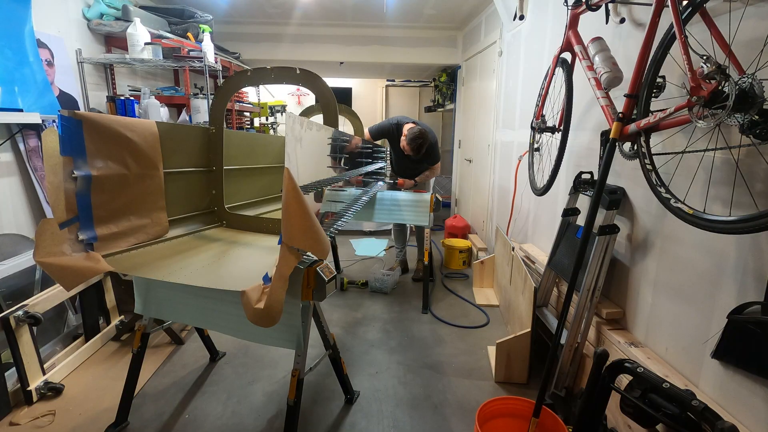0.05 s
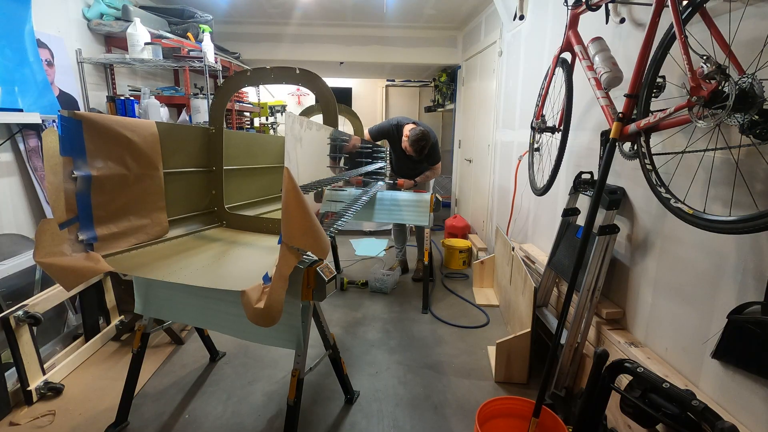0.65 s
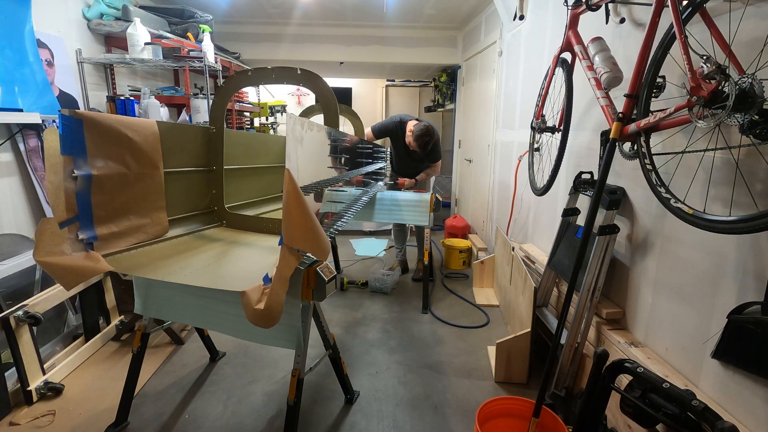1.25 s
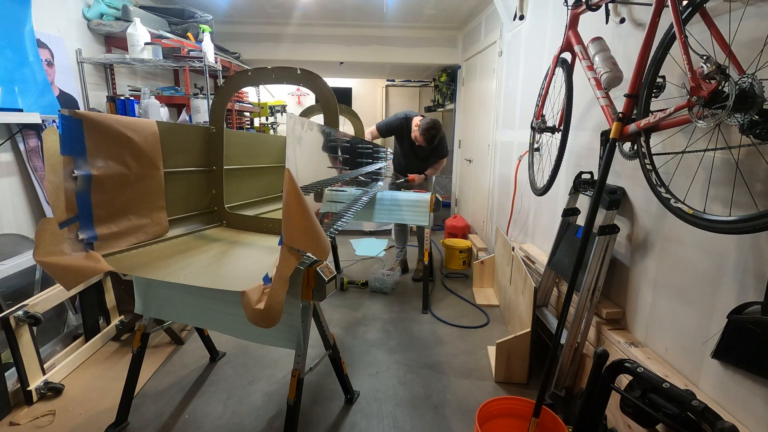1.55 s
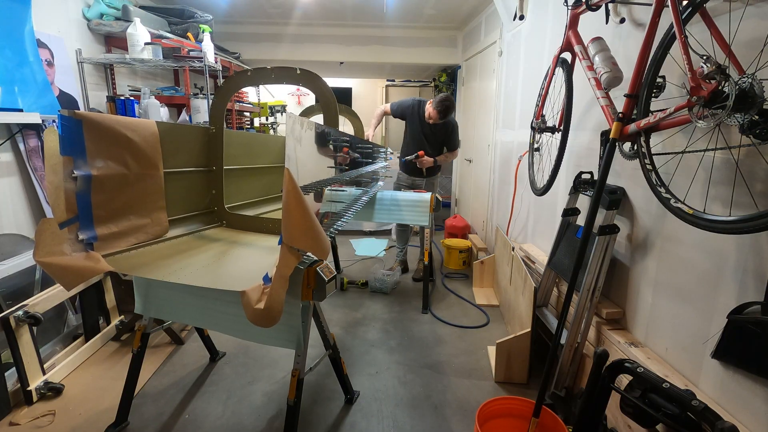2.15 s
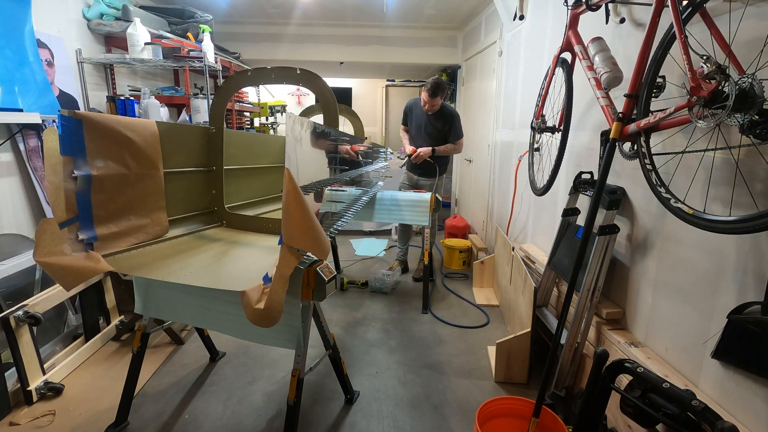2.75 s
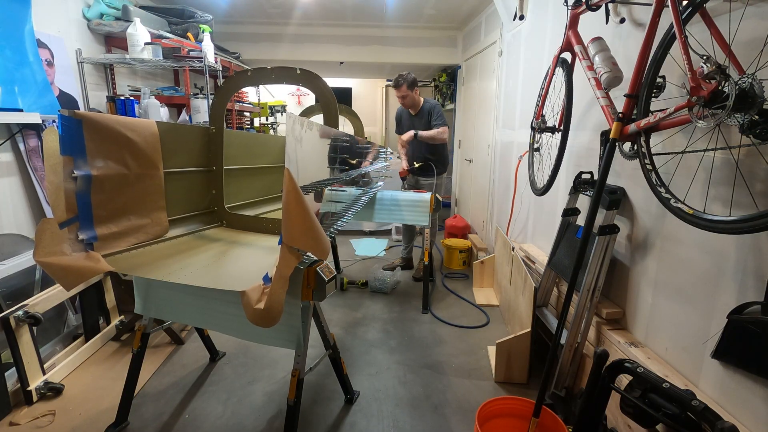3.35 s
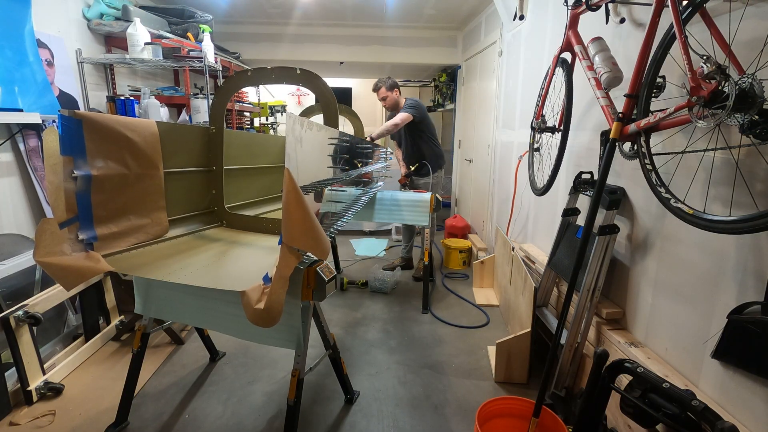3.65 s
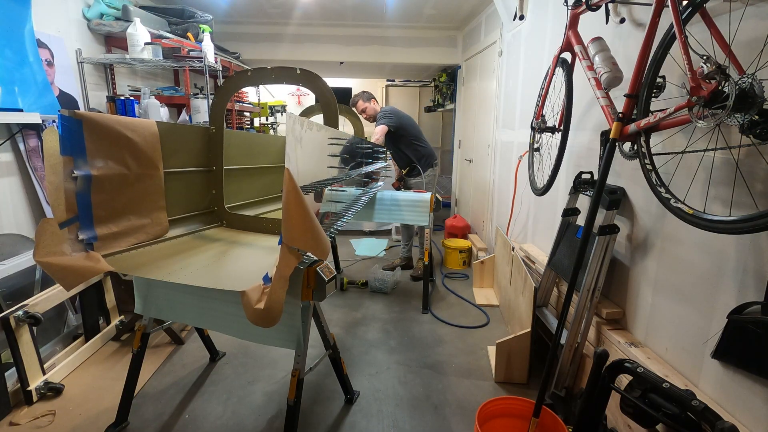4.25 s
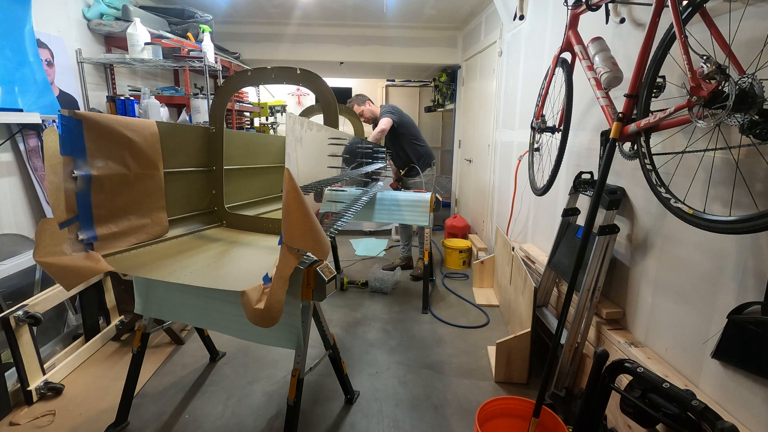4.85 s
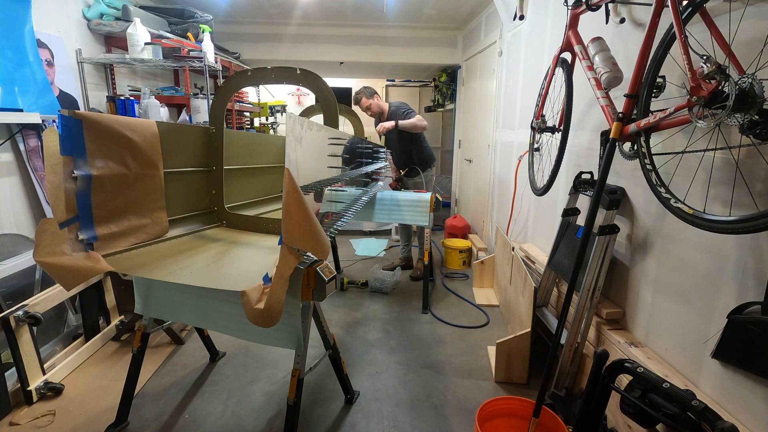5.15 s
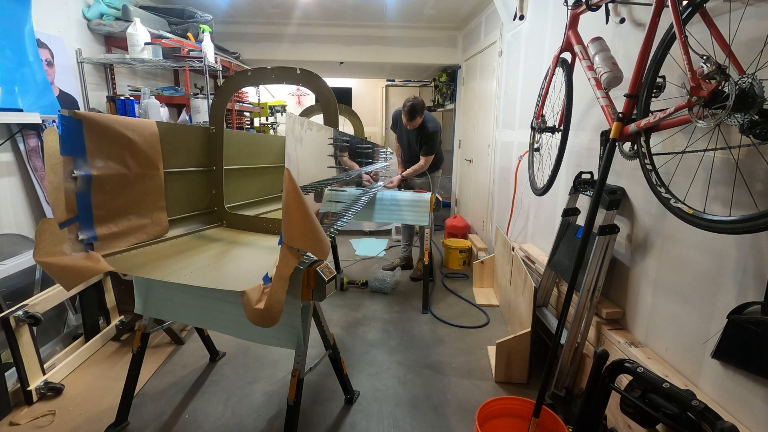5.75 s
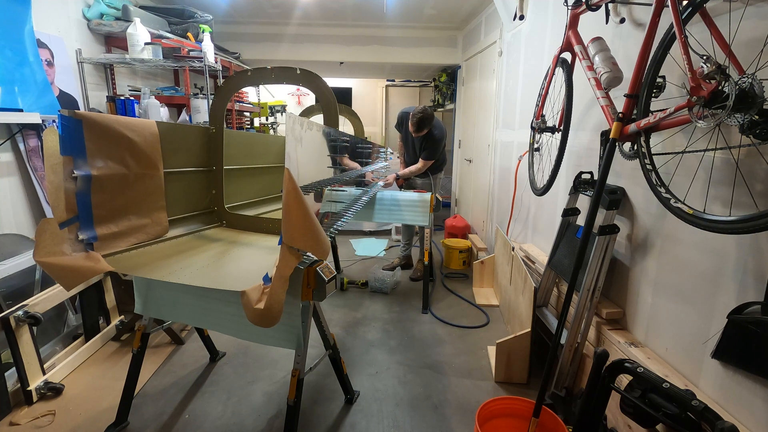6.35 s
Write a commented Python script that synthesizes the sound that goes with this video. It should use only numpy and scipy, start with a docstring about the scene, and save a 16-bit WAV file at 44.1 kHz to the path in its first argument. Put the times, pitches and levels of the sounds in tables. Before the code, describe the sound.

A soft trigger knock and a light metal tap lead straight into a loud burst from an air rivet gun at 0.4 seconds. It hammers an aluminium airframe about 25 times a second with a hiss of air, booming at first and then ringing brighter, until a few slack blows end it around 1.3 seconds. Everything afterwards is much quieter. Faint steel scrapes and taps follow until 2 seconds while the frame's low ring fades. Small tools click near 2.7 seconds, and at 3.1 one knocks on a bench and slides with a brief swish. From 4.1 to 4.8 a tool bumps and drags along the sheet. A heavy tool thuds down at 5 seconds, followed by a few tiny clicks. The work is heard from across a garage with a short echo, over a faint ventilation hum, low rumble and barely audible air leak.

```python
"""A loud, rattling burst of metal blows rings out from the far end of a garage, just after a light tap.
It is an air-driven rivet gun setting one rivet in an aluminium airframe, at about 25 blows a second.
The metal skin booms at first, rings brighter as the rivet hardens, and the last blows fall slack.
Then tools tap, slide over the sheet and are put down, over a ventilation hum and a faint air leak."""
import sys
import numpy as np
from scipy import signal
from scipy.fft import rfft, irfft, next_fast_len
from scipy.io import wavfile
from scipy.ndimage import map_coordinates

SR = 44100
rng = np.random.default_rng(int(sys.argv[2]) if len(sys.argv) > 2 else 0)


def waveform_to_disk(signal):
    """Save audio, clipped to [-1, 1], as 16-bit WAV at the path in sys.argv[1]."""
    frames = np.transpose(np.atleast_2d(signal))
    scaled = np.clip(frames, -1, 1) * 32767
    samples = np.round(scaled).astype(np.int16)
    wavfile.write(sys.argv[1], SR, samples)


N = 291060
FIRST_BLOW_S = 0.4108

# Tone colours (how strong each pitch is) of steel crack, skin clang and frame boom: f/Hz, level/dB
CRACK = [(820, -33.5), (1400, -10), (1640, -7), (1880, -2.5), (2070, -4), (2270, -3), (3040, -2),
         (4510, -3.5), (4880, -10), (6030, -11.5), (10300, -28.5), (13800, -38), (15600, -46.5)]
CLANG = [(260, -43), (450, -10.5), (540, -9), (630, -4), (780, -5.5), (1000, -2), (1160, -6.5), (1610, -8),
         (1750, -6), (2210, -35.5), (3740, -120)]
BOOM = [(15, -70), (40, -36), (110, -12.5), (170, -7), (260, 0.5), (345, 0), (420, -4), (475, -23),
        (545, -15), (660, -16.5), (900, -40), (1600, -120)]
# Clear notes of the rivet set, the gun's steel tip: f/Hz, level/dB
TIP_NOTES = [(543.7, -51.5), (1028, -43), (1863, -40.5), (2191, -37.5), (2315, -41), (3381, -40),
             (3510, -41), (3580, -38), (3709, -39.5), (4059, -39.5), (4587, -41.5), (4683, -47),
             (5830, -43.5), (6250, -49.5), (6848, -50.5), (6993, -49.5), (7095, -46), (7892, -49.5)]
def rivet_gun(count=19, first_gap_s=0.0378, slowing_s=0.00017):
    """A piston hammers, slowing a little; each blow cracks on steel, clangs the skin, shoves the frame."""
    k = np.arange(count)
    age = first_gap_s * k + slowing_s * k * (k - 1) / 2
    times, first = FIRST_BLOW_S + age, k == 0
    soft = np.exp(-age / 0.16)  # the rivet hardens under the blows
    eased = np.exp((age - age[-1]) / 0.04)  # the push on the gun eases at the end
    extra_db = 2.5 * first  # the first blow has full air pressure behind it
    boom_db = -36 + 14.5 * soft + extra_db
    clang_db = -23 - 25 * age + 10 * eased + extra_db  # dies as the rivet clamps the sheets, then returns
    crack_db = -21.5 + extra_db
    tilt, no_tilt = 2.2 * (1 - soft) + 3.2 * first, np.zeros(count)  # added brightness, dB per octave
    out = hammering(metal(CRACK, ring_db=0), times, crack_db, tilt,
                    alike=0.88, direct_db=-2.5, direct_s=0.016)
    out += hammering(metal(CLANG, ring_db=-0.5), times + 0.003, clang_db, no_tilt,
                     alike=0.88, direct_db=-2.5, direct_s=0.02)
    out += hammering(colour(BOOM), times + 0.004, boom_db, no_tilt, alike=0.7, direct_db=2, direct_s=0.02)
    shove = frame_ring(rise_s=0.0045)
    tip = [(hz, db, 0.4) for hz, db in TIP_NOTES]  # each note rings for 0.4 s
    for s, frame_db, steel_db in zip(times, boom_db, crack_db):
        add(out, s + 0.003, amp(frame_db - 0.5) * shove)
        add(out, s, amp(steel_db - 10.5) * tones(tip, scatter_db=2))
    return out


def hammering(gain, times, levels_db, tilts, alike, direct_db, direct_s):
    """Blows on one spot: each repeats much of the same ring, and the rest changes as the tool shifts."""
    out = np.zeros((2, N))
    same = strike(gain, direct_db, direct_s, rise_s=0.00061)
    for s, db, tilt in zip(times, levels_db, tilts):
        fresh = strike(gain, direct_db, direct_s, rise_s=0.0018)
        blow = np.sqrt(alike) * same + np.sqrt(1 - alike) * fresh
        add(out, s, amp(db) * filtered(blow, lambda hz: amp(tilt * np.log2(np.maximum(hz, 1000) / 3500))))
    return out


# Low notes of the airframe: f/Hz, level/dB, ring time/s (the time to fade by 60 dB)
FRAME_NOTES = [(52, -16.5, 0.18), (73.7, -27, 3.9), (78.0, -32.5, 4.3), (100, -11.5, 0.51),
               (159, -7.5, 0.19), (178.7, -20, 0.95), (215.3, -6.5, 0.2), (258.3, -20, 2.1),
               (287, -4, 0.099), (349.4, 1, 0.22), (390, -11.5, .07), (543, -7.5, 0.22)]
def frame_ring(rise_s):
    """The airframe hums its low notes after one push."""
    t = np.arange(2 * SR) / SR
    ring = sum((-1) ** k * amp(db - 60 * t / ring_s) * np.sin(2 * np.pi * hz * t)
               for k, (hz, db, ring_s) in enumerate(FRAME_NOTES))
    return unit_start(ring * (1 - np.exp(-t / rise_s)))


# Pitches at which the sheet and the gun's tip ring: f/Hz, width/Hz, level/dB (halved when used)
METAL_PEAKS = [(516, 20, -15.5), (1030, 170, -2.5), (1291, 150, -9.5), (1480, 180, -5.5), (1873, 98, 4.5),
               (2170, 97, -5.5), (2650, 220, -12.5), (3550, 17, 1), (4000, 42, -4.5), (4600, 46, 4.5),
               (5200, 23, -11), (5102, 60, -16.5), (5900, 54, -9.5), (6200, 25, -12), (6900, 33, -12),
               (7890, 32, -14.5), (9700, 140, -19.5), (10500, 83, -23.5)]
def metal(points, ring_db):
    """A tone colour made stronger wherever the metal likes to ring."""
    peaks = lambda hz: sum(amp(db / 2) * peak(hz, centre, width) for centre, width, db in METAL_PEAKS)
    return lambda hz: amp(along(points, hz)) * (1 + amp(ring_db) * peaks(hz))


# Tone colours of the escaping air and the trigger's knock: f/Hz, level/dB
JET = [(1000, -60.5), (3000, -9.5), (5500, -0.5), (7500, -4), (10000, -11.5), (13000, -22.5),
       (15600, -31.5)]
TRIGGER = [(60, -50.5), (130, -10), (175, -0.5), (230, -10), (400, -34), (900, -120)]
def trigger_and_air():
    """The trigger goes down with a dull knock; spent air hisses ever louder while the gun runs."""
    exhaust = gesture(FIRST_BLOW_S, length_s=0.74, db=-37.5, db_per_s=9, edge_s=0.02)
    out = rub(exhaust, colour(JET), grit_db=0.5)
    add(out, 0.275, amp(-50.5) * strike(colour(TRIGGER), direct_db=10, direct_s=0.015, rise_s=0.005))
    return out


# Last loose blows: t/s, level/dB
SLACK_BLOWS = [(1.164, -21.5), (1.205, -23.5), (1.248, -26), (1.305, -35.5)]
# Tone colour of the rattling sheet: f/Hz, level/dB
RATTLE = [(71, -47), (120, -11), (169, -5), (199, -16), (350, -8.5), (446, -18), (604, -0.5), (905, -7),
          (981, 0), (1330, -11.5), (1470, -9.5), (3230, -11), (4550, -10), (10000, -34), (15000, -58)]
def slack_blows():
    """The trigger is let go and the pressure falls, so the tip bounces loosely and the sheet rattles."""
    out, rattle = np.zeros((2, N)), metal(RATTLE, ring_db=-10)
    for s, db in SLACK_BLOWS:
        add(out, s, amp(db) * strike(rattle, direct_db=-12, direct_s=0.0068, rise_s=0.00067))
    return out


# Light taps on the skin: t/s, clank level/dB, frame boom level/dB
TAPS = [(0.274, -57, -59), (0.389, -29.5, -41), (1.756, -50.5, -56.5), (1.894, -56.5, -58)]
# Tone colour of a clank: f/Hz, level/dB
CLANK = [(290, -39), (500, -6), (665, -1), (883, -14.5), (1350, -9.5), (2390, -15), (4800, -14.5),
         (12300, -39.5), (15000, -71.5)]
# Notes of the bucking bar, the steel block held behind the rivet: f/Hz, level/dB, ring time/s
BAR_NOTES = [(724, -11, 0.33), (1430, -4.5, .45), (1660, -0.5, 0.37), (2600, -10.5, .45),
             (3070, -6.5, 0.33), (4060, -5, .5), (4910, -7, 0.28), (6250, -12.5, .3), (8184, -20.5, .35)]
def taps():
    """The gun's tip and the bar touch the skin before and after the burst; bar and frame ring."""
    out, ring = np.zeros((2, N)), frame_ring(rise_s=0.009)
    for s, db, boom_db in TAPS:
        add(out, s, amp(db) * strike(metal(CLANK, ring_db=0), direct_db=-10, direct_s=0.013, rise_s=0.004))
        add(out, s, amp(db - 9.5) * tones(BAR_NOTES, scatter_db=4.5))
        add(out, s, amp(boom_db) * ring)
    return out


# Tone colour of steel chattering on the rivet: f/Hz, level/dB
CHATTER = [(180, -34.5), (300, -5), (359, 1), (430, -12), (726, -6), (1270, -24.5), (1490, -8), (2040, -6),
           (5180, -23.5), (9490, -25), (15000, -47.5)]
def tip_chatter():
    """The tip chatters ever harder on the rivet head as the trigger is eased in."""
    effort = gesture(0.255, length_s=0.16, db=-63, db_per_s=200, edge_s=0.012)
    return rub(effort, colour(CHATTER), grit_db=3)


# Short scrapes of the bar: t/s, level/dB
BAR_SCRAPES = [(1.49, -55), (1.595, -56.5), (1.756, -53), (1.865, -54)]
# Tone colour of the drumming panel: f/Hz, level/dB
PANEL = [(60, -60), (120, -45), (220, -10), (290, -10.5), (345, 2.5), (400, -8), (600, -48), (1200, -120)]
def bar_scrapes():
    """The bar slides off the rivet, which keeps it singing faintly and drums the panel."""
    moves = [gesture(s, length_s=0.126, db=db, db_per_s=-87, edge_s=0.018) for s, db in BAR_SCRAPES]
    effort = np.linalg.norm(moves, axis=0)
    peaks = lambda hz: sum(peak(hz, centre, width_hz=70) for centre, _, _ in BAR_NOTES)
    singing = lambda hz: amp(along(CHATTER, hz)) * (1 + amp(13) * peaks(hz))
    return rub(effort, singing, grit_db=5.5) + amp(-2) * rub(effort, colour(PANEL), grit_db=4.5)


# Clicks of small tools: t/s, level/dB
CLICKS = [(2.3878, -75), (2.692, -68), (2.7405, -55.5), (3.075, -52), (3.174, -66), (3.5757, -78),
          (3.8207, -67), (5.8787, -76), (5.9354, -74), (6.488, -78), (6.5362, -72.5)]
# Tone colours of a click and of a knock on the bench: f/Hz, level/dB
CLICK = [(590, -50), (1000, 0), (1080, -10.5), (1670, -5), (2530, -3), (5110, -5), (10800, -20),
         (15000, -48.5)]
BENCH = [(240, -37), (400, -8.5), (770, -9), (907, -1), (1350, 1), (2150, -0.5), (3500, -14), (5320, -30),
         (6860, -29), (11000, -46), (15000, -64.5)]
def small_tools():
    """Tools click in the hands, and one knocks hard on the bench."""
    out = np.zeros((2, N))
    for s, db in CLICKS:
        add(out, s, amp(db) * strike(colour(CLICK), direct_db=-13, direct_s=0.0043, rise_s=0.00038))
    add(out, 3.061, amp(-40.5) * strike(colour(BENCH), direct_db=3.5, direct_s=0.0033, rise_s=0.00027))
    return out


# Thuds of a heavy tool: t/s, level/dB
THUDS = [(4.987, -35.5), (5.004, -34), (5.036, -37)]
# Tone colour of a thud: f/Hz, level/dB
HEAVY = [(60, -40), (115, -10), (147, -0.5), (188, -5), (230, -7), (275, 0.5), (340, -8.5), (630, -11.5),
         (780, -15.5), (1040, -13.5), (2900, -19.5), (6000, -26.5), (11000, -40), (15000, -54)]
# Notes of the bench top and the low room note it wakes: f/Hz, level/dB, ring time/s, rise time/s
BENCH_NOTES = [(68.8, -34, 1.02, 0.13), (153.4, -31, 0.68, 0.022), (228, -26, 0.18, 0.0038),
               (266, -28.5, 0.51, 0.0034)]
def heavy_tool():
    """A heavy tool is set down and settles, and the bench top booms."""
    out, t = np.zeros((2, N)), np.arange(SR) / SR
    for s, db in THUDS:
        add(out, s, amp(db) * strike(colour(HEAVY), direct_db=2, direct_s=0.037, rise_s=0.0099))
    for hz, db, ring_s, rise_s in BENCH_NOTES:
        loudness = amp(db - 60 * t / ring_s) * (1 - np.exp(-t / rise_s))
        add(out, THUDS[0][0], loudness * np.sin(2 * np.pi * hz * t))
    return out


# Tone colour of a slide on the bench: f/Hz, level/dB
SWISH = [(470, -49), (800, -27), (1170, -1), (1270, -5.5), (2440, -8), (4970, -2.5), (12200, -30.5),
         (14100, -41.5), (15000, -51.5)]
def bench_slide():
    """A tool slides to rest on the bench with a fading swish."""
    effort = gesture(3.12, length_s=0.34, db=-45, db_per_s=-52, edge_s=0.045)
    return rub(effort, colour(SWISH), grit_db=2)


# Shoves along the sheet: t/s, scuff level/dB, panel boom level/dB, drag level/dB
SHOVES = [(4.152, -41, -42, -41.5), (4.211, -41.5, -38.5, -42.5), (4.279, -47.5, -49.5, -57),
          (4.356, -49, -51, -39.5), (4.45, -44.5, -45, -33), (4.644, -57, -65, -40)]
# Tone colours of the drag and the scuff: f/Hz, level/dB
DRAG = [(260, -37), (450, -23), (530, -16), (691, -11), (814, -32), (986, -11), (1230, -4), (1860, -1.5),
        (2040, -5.5), (3180, 0.5), (3630, -4), (5340, -6), (7960, -14), (15500, -37.5)]
SCUFF = [(350, -30), (420, -11), (575, -7), (787, -6), (1030, -0.5), (1790, -13.5), (3210, -18),
         (6000, -26.5), (8500, -32), (11000, -44), (15000, -65)]
# Lowest notes of the panel: f/Hz, level/dB, ring time/s
PANEL_NOTES = [(349, 3, 0.47), (363, -8, 0.32)]
def sheet_shoves():
    """A tool is shoved along the sheet: each shove is a bump and a fading drag, and the panel drums."""
    moves = [gesture(s, length_s=0.25, db=db, db_per_s=-100, edge_s=0.019) for s, _, _, db in SHOVES]
    effort = np.linalg.norm(moves, axis=0)
    out = rub(effort, colour(DRAG), grit_db=1) + amp(-13) * rub(effort, colour(PANEL), grit_db=5)
    for s, scuff_db, boom_db, _ in SHOVES:
        add(out, s, amp(boom_db - 2) * tones(PANEL_NOTES, scatter_db=0.5))
        add(out, s, amp(scuff_db) * strike(colour(SCUFF), direct_db=-3, direct_s=0.0081, rise_s=0.0043))
        add(out, s, amp(boom_db) * strike(colour(PANEL), direct_db=-3, direct_s=0.016, rise_s=0.003))
    return out


# Tone colours of the low rumble and the ventilation: f/Hz, level/dB
RUMBLE = [(11, -30.5), (18, 4), (49, -2.5), (114, -14), (156, -8), (206, -12.5), (288, -10.5), (381, -21),
          (428, -22.5), (503, -26.5), (600, -26.5), (780, -53.5), (1320, -120)]
VENT = [(240, -27.5), (400, -3), (438, -5), (500, -13.5), (691, -9.5), (846, -14), (1100, -7),
        (1750, -12.5), (4500, -36.5), (5850, -74.5), (9900, -120)]
# How loud each is heard over time: t/s, level/dB
RUMBLE_LEVEL = [(0, -64), (2.6, -65), (4, -60), (5.8, -55.5), (6.6, -59.5)]
HEARD_HUM_LEVEL = [(0, -66), (1.6, -64.5), (2.15, -73), (3, -66.5), (6.3, -65.5), (6.6, -58.5)]
def rumble_and_ventilation():
    """Uneven rumble, and a steady ventilation hum that the recorder briefly turns down after the burst."""
    rumble = amp(over_time(RUMBLE_LEVEL) + 2 * wobble(11)) * room_noise(colour(RUMBLE), N)
    return rumble + amp(over_time(HEARD_HUM_LEVEL) + 0.4 * wobble(4.8)) * room_noise(colour(VENT), N)


# Tone colour of the leak: f/Hz, level/dB
LEAK = [(2000, -18), (3500, -0.5), (5500, 0.5), (8000, -4), (11000, -11), (15000, -24.5)]
def air_leak():
    """Air hisses steadily from the hose coupling; a thin whistle comes and goes after the burst."""
    hiss = amp(-80.5) * room_noise(colour(LEAK), N)
    whistle = gesture(1.6, length_s=3.6, db=-84.5, db_per_s=-0.5, edge_s=0.66)
    return hiss + whistle * room_noise(lambda hz: peak(hz, centre_hz=5400, width_hz=70), N)


# How long the garage echoes: f/Hz, ring time/s
GARAGE_ECHO = [(70, 1), (150, 0.74), (300, .75), (600, 0.59), (2000, 0.56), (6000, 0.5), (12000, .42)]
def strike(gain, direct_db, direct_s, rise_s):
    """One hit heard across the garage: a short direct burst, then echoes whose highs die first."""
    size = 3 * SR // 4
    hz, frame_s, bands = signal.stft(room_noise(gain, size), SR, nperseg=256)
    fade = amp(-60 * frame_s / along(GARAGE_ECHO, hz)[:, None])
    echoes = signal.istft(bands * fade, SR, nperseg=256)[1][:, :size]
    t = np.arange(size) / SR
    burst = 1 + amp(direct_db) * np.exp(-t / direct_s)
    return unit_start(echoes * burst * (1 - np.exp(-t / rise_s)))


def rub(effort, gain, grit_db):
    """Rubbing or hissing: tiny uneven pulses, whose path through the room changes as the tool moves."""
    pulses = unit(rng.standard_normal(N) * amp(grit_db * wobble(250))) * effort
    out, step = np.zeros((2, N)), SR // 20
    for i in np.unique(np.flatnonzero(effort) // step) * step:
        path = strike(gain, direct_db=12, direct_s=0.00587, rise_s=0.00029)
        path /= np.linalg.norm(path[0])
        add(out, i / SR, signal.fftconvolve(pulses[None, i:i + step], path, axes=1))
    return out


def tones(notes, scatter_db):
    """Metal rings at its own notes, with new strengths for every hit."""
    t = np.arange(3 * SR // 4) / SR
    ring = np.zeros((2, len(t)))
    for hz, db, ring_s in notes:
        loudness = amp(db + rng.normal(0, scatter_db) - 60 * t / ring_s)
        ring += loudness * np.sin(2 * np.pi * hz * t + rng.normal(0, 0.71, (2, 1)))
    return unit_start(ring * (1 - np.exp(-t / 0.0015)))


# The part that differs between the ears, against the part they share: f/Hz, level/dB
STEREO_WIDTH = [(30, -11), (130, -23.5), (280, -14.5), (550, -9.5), (1100, -8), (2200, -6), (4500, -3.5),
                (9000, -1)]
def room_noise(gain, size):
    """Coloured noise in a room: alike at both ears in the bass, almost unrelated in the treble."""
    shape = lambda hz: gain(hz) * np.array([np.ones_like(hz), amp(along(STEREO_WIDTH, hz))])
    shared, side = filtered(rng.standard_normal((2, size)), shape)
    return unit(np.array([shared + side, shared - side]))


def gesture(start_s, length_s, db, db_per_s, edge_s):
    """Loudness of one movement: it sets in, swells or fades at a steady rate, and lets go."""
    age = np.clip(np.arange(N) / SR - start_s, 0, length_s)
    return np.clip(np.minimum(age, length_s - age) / edge_s, 0, 1) * amp(db + db_per_s * age)


def amp(db):
    """Turn decibels into a gain, the number to multiply a sound by."""
    return 10 ** (np.asarray(db) / 20)


def unit(x):
    """Scale a sound to an average (rms) strength of 1."""
    return x / np.sqrt(np.mean(x ** 2) + 1e-20)


def unit_start(x):
    """Scale a sound so its first 50 ms have an average strength of 1."""
    return x / np.sqrt(np.mean(x[..., :SR // 20] ** 2))


def along(points, hz):
    """Read between a table's rows on a pitch (log) scale."""
    freqs, values = np.transpose(points)
    return np.interp(np.log(hz + 1), np.log(freqs + 1), values)


def over_time(points):
    """Read a table of times and levels at every sample."""
    return np.interp(np.arange(N) / SR, *np.transpose(points))


def colour(points):
    """Turn a tone colour table into a gain for each frequency."""
    return lambda hz: amp(along(points, hz))


def peak(hz, centre_hz, width_hz):
    """A hump of height 1 around one pitch."""
    return 1 / (1 + (2 * (hz - centre_hz) / width_hz) ** 2)


def wobble(rate):
    """A smooth curve through `rate` random values a second."""
    return map_coordinates(rng.standard_normal(int(N * rate / SR) + 4), [np.arange(N) * rate / SR])


def filtered(x, response):
    """Turn each frequency of a sound up or down."""
    size = x.shape[-1]
    padded = next_fast_len(size + 4096, real=True)
    return irfft(rfft(x, padded) * response(np.fft.rfftfreq(padded, 1 / SR)), padded)[..., :size]


def add(track, s, sound):
    """Mix a sound into a track, starting at s seconds."""
    part = track[:, max(round(s * SR), 0):][:, :sound.shape[-1]]
    part += sound[..., :part.shape[-1]]


# How much louder the work is on the left than on the right: f/Hz, level/dB
LEFT_LEAN = [(60, 0.5), (110, 2.5), (200, 0.5), (380, 0), (700, 2.0), (1290, 1.5), (2380, 4), (4400, 3.5),
             (8120, 1), (15000, -3)]
def scene():
    """All the work comes from one place, a little louder on the left and a hair earlier on the right."""
    work = rivet_gun() + trigger_and_air() + slack_blows() + taps() + tip_chatter() + bar_scrapes()
    work += small_tools() + heavy_tool() + bench_slide() + sheet_shoves()
    lag_s = 2.5e-5
    balance = lambda hz: amp(np.outer([0.5, -0.5], along(LEFT_LEAN, hz)))
    delay = lambda hz: np.exp(np.outer([-1, 1], 1j * np.pi * hz * lag_s))
    return filtered(work, lambda hz: balance(hz) * delay(hz)) + rumble_and_ventilation() + air_leak()


def record(dry):
    """Round off the loudest peaks and cut the very highest treble."""
    ceiling, hardness, top_hz = 0.85, 6, 15700
    rounded = dry / (1 + np.abs(dry / ceiling) ** hardness) ** (1 / hardness)
    return filtered(rounded, lambda hz: hz < top_hz)


dry = scene()
out = record(dry)
waveform_to_disk(out)
```